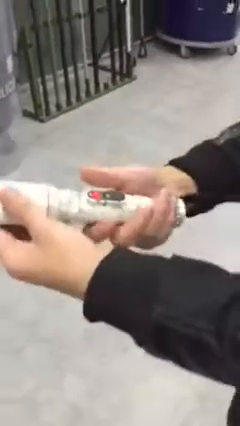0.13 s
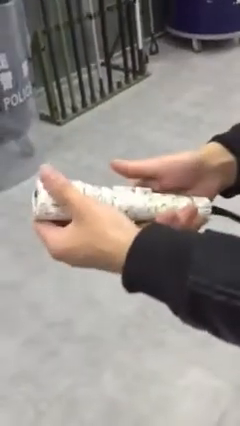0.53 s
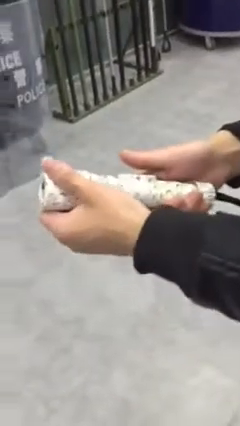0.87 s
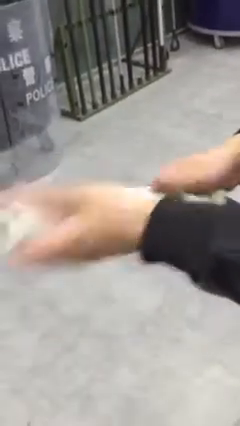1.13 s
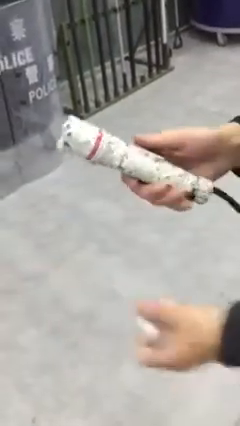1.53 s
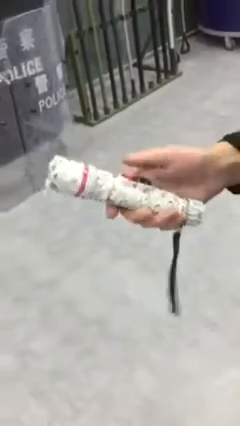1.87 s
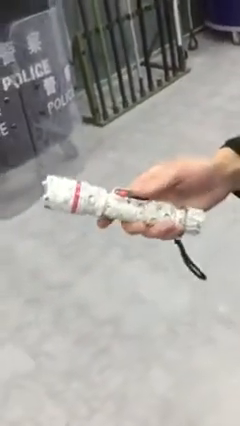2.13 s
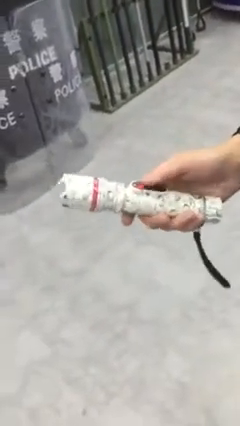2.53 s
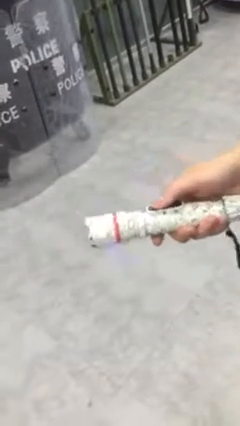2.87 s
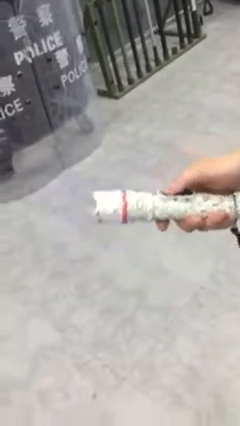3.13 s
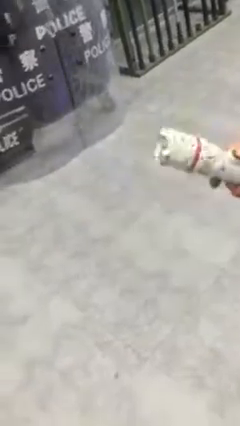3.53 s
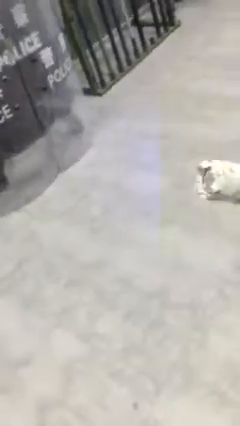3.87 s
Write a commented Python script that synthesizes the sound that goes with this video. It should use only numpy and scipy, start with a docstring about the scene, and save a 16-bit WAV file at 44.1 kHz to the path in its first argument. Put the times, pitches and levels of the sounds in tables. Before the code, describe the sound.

A stun gun is handled in a quiet, hard-floored room, with faint sleeve rustle and small clicks. At about 1.1 seconds its cap slides off with a quick falling hollow note and pop; at 1.75 it knocks down, rumbling low until 2.3. Soft bumps and a switch click with a tiny whine follow. From 2.7 to the end, deafening electric snaps crack rapidly, echoing brightly and thumping the overloaded, nearly mono microphone.

```python
"""Stun gun in a hard-floored room

A quiet room, a torch-shaped stun gun and a nearly mono microphone. Sleeves rustle; the cap is pulled off with
a falling cavity note and a pop, then put down with a knock and a hollow rumble, all made of filtered noise
and decaying tones. The switch clicks and sparks snap about thirteen times a second: nearly all are a noise
crack, slaps off floor and walls and a bright room ring, and jolt the overloaded microphone into a thump."""
import sys
import numpy as np
from scipy import signal
from scipy.fft import rfft, irfft
from scipy.io import wavfile

SR = 44100
rng = np.random.default_rng(int(sys.argv[2]) if len(sys.argv) > 2 else 0)


def to_wav(s):
    """Save 16-bit WAV."""
    ch = np.atleast_2d(s).T  # columns
    pcm = np.round(np.clip(ch, -1, 1) * 32767)  # PCM
    wavfile.write(sys.argv[1], SR, pcm.astype(np.int16))


N = 176400
T = np.arange(N) / SR   # time axis in seconds
HZ = np.maximum(np.fft.rfftfreq(N, 1 / SR), 1)   # frequency axis, kept above zero for logarithms

# Room air, spectrum under everything: pitch_hz, relative_db
AIR = [(20, -22), (66, -1), (150, -5.5), (335, -11), (462, -15.5), (709, -15.5), (2130, -23.5),
       (15000, -42.5)]
AIR_DB = -51

# Sleeve rustles: start_s (their peak), level_db, rise_s, fall_s
RUSTLES = [(.095, -41, 0.019, 0.073), (1.6, -54.5, 0.39, 0.97), (2.409, -48.5, 0.034, 0.085)]
# Spectrum of the cloth: pitch_hz, relative_db
RUSTLE_COLOUR = [(590, -27), (1000, -1), (1910, 4), (2290, 3.5), (8710, -11), (15000, -22)]
UNEVEN_DB, UNEVEN_HZ = 0.5, 25   # slow unevenness of rustle and rumble
# Light clicks of plastic and switch: start_s, level_db, centre_hz, width_octaves, fall_s
CLICKS = [(0.1907, -31.5, 5100, 0.45, 0.0026), (1.014, -38.5, 1460, 0.28, 0.026),
          (2.011, -42, 2280, 0.25, 0.017), (2.197, -42, 1420, 0.34, 0.027),
          (2.632, -37.5, 3090, 0.25, 0.0021)]
WHINE_S, WHINE_HZ, WHINE_DB, WHINE_FALL_S = 2.638, 8800, -45, 0.013   # the converter charging up
# Soft low bumps: start_s, level_db, pitch_hz
BUMPS = [(0.504, -35, 148), (0.578, -39, 154), (1.316, -36.5, 175), (2.04, -33, 102), (2.405, -32.5, 133),
         (2.425, -26, 137), (2.455, -26, 141), (2.48, -30.5, 158), (2.507, -33, 116), (2.546, -33.5, 143),
         (2.593, -33.5, 137), (2.685, -16.5, 185)]
BUMP_S = 0.0068   # onset to envelope peak

# The cap slides off and pops free; spectrum of friction and pop: pitch_hz, relative_db
POP_COLOUR = [(210, -66), (350, -57), (487, -11.5), (1330, -3.5), (2240, -9), (3060, -7.5), (3760, -8.5),
              (15000, -20)]
CAP_POP_S, POP_DB, POP_FALL_S = 1.1072, -22.5, 0.0016
SLIDE_DB, SLIDE_RISE_S, SLIDE_FALL_S = -26, 0.022, 0.0046
# Falling note of the cap's cavity: time_s, pitch_hz, level_db
CAVITY = [(1.04, 2688, -55), (1.068, 2500, -39.5), (1.082, 2060, -35), (1.095, 1686, -43),
          (1.103, 1279, -26), (1.115, 750, -39), (1.125, 650, -73)]
CAVITY_WIDTH_HZ = 210
GRIT_HZ, SLIDE_GRIT_DB = 500, 1.5   # how fast cracks and friction flicker, and how deeply the cap catches

# The cap is put down on something hollow; spectrum of the knock: pitch_hz, relative_db
KNOCK_COLOUR = [(88, -34), (150, -25), (540, 4), (812, -17), (1230, -6.5), (1410, -23), (1670, -8),
                (3130, -17), (14000, -43)]
KNOCK_S, KNOCK_DB, KNOCK_FALL_S = 1.751, -25.5, 0.024
# Spectrum of the rumble after it: pitch_hz, relative_db
RUMBLE_COLOUR = [(24, -41), (40, -5), (65, 5), (143, 2), (337, -9), (579, -13), (815, -20), (1360, -22),
                 (1920, -22), (5380, -25.5), (14000, -46)]
# Decay of the rumble: pitch_hz, t60_s
RUMBLE_T60 = [(80, 1.14), (300, 2.84), (2000, 1.55), (9000, 0.66)]
RUMBLE_DB, RUMBLE_BUILD_S, RUMBLE_STOP_S, RUMBLE_STOP_FALL_S = -26.5, 0.028, 2.26, 0.024
# Noisy resonances in the rumble: pitch_hz, level_db, width_hz
RUMBLE_BANDS = [(559, -39, 22), (1920, -44, 59), (2300, -44.5, 160)]
BANDS_FALL_S = 0.2
# Low tones of the hollow body: pitch_hz, level_db, t60_s
BODY_MODES = [(74.9, -26.5, 1.3), (139.6, -27.5, 1.25)]

HANDLING_ROOM_DB, HANDLING_T60_S = -14, 0.37   # room tail on handling and cap removal

# Sparks: start_s, crack_db, ring_db, kick_db, kick_fall_ms (the last two are the microphone's jolt)
SPARKS = [(2.7013, -8, -14, 5, 4.1), (2.745, -38, -15.5, -32, 1), (2.8487, -1.5, -14, 12, 1.7),
          (2.9184, 1.5, -15, -15, 0.36), (2.9871, -2.5, -18, 10.5, 0.73), (3.064, -5, -20, 2.5, 1.9),
          (3.138, -9, -19, -23, 1.1), (3.2262, -10.5, -20, 11, 0.39), (3.296, -0.5, -19.5, 1.5, 1.65),
          (3.377, -1, -17, 16, 0.27), (3.4574, -5, -19.5, 11, 0.71), (3.5383, -3, -17, 15, 0.32),
          (3.615, -2.5, -20.5, 5.5, 0.15), (3.6981, 5, -17.5, 6.5, 0.092), (3.7877, 4.5, -18, -1.5, 0.38),
          (3.8654, 0, -16.5, 11.5, 0.55), (3.9415, 1, -18, 17, 0.26)]
# A few milliseconds after some kicks, the slap off the floor kicks the microphone the other way: start_s,
# kick_db, kick_fall_ms
FLOOR_KICKS = [(2.7042, -8, 1.4), (2.8545, 6.5, 1.1), (2.9239, 10.5, 1.06), (2.9927, 9.5, 0.65),
               (3.07, 4, 0.52), (3.1441, -13, 2.3), (3.2312, -1, 1.5)]
JOLT_RISE_MS = 0.21
# The microphone's low cut, and the corners of the phase lag that turns a jolt into a falling sweep
MIC_CUT_HZ, MIC_Q = 58.2, 1.97
# All-pass corners of that lag: corner_hz
MIC_LAG_HZ = [76, 77, 575, 590, 600, 4770]

# Spectrum of the crack: pitch_hz, relative_db
CRACK_COLOUR = [(300, 9), (1000, 3.5), (2700, 2.5), (6000, 0.5), (10000, -9), (15000, -0.5)]
CRACK_RISE_S, CRACK_FALL_S, CRACK_GRIT_DB = 0.00082, 0.0013, 2.5
SWELL_DB, SWELL_RISE_S = -17, 0.012   # level and rise of a noise swell before the first crack
# Slaps off the floor and walls: delay_s, level_db against the ring; the first travels some 1.9 m further
ECHOES = [(.0054, 10.5), (0.0111, 8), (0.0162, 9), (0.0202, 2.5), (0.0224, 2.5), (.033, -5), (0.038, -8)]
ECHO_FALL_S, ECHO_WANDER = 0.00062, 0.025   # wander: random spread as a share of the delay

# The room's answer to a spark, spectrum: pitch_hz, relative_db
RING_COLOUR = [(88, -20), (150, -3.5), (283, -8), (409, -5.5), (833, -9.5), (1180, -6), (1320, -6.5),
               (2100, -2.5), (2270, -3), (6430, 1), (10800, -7.5), (15000, -10)]
# Decay of that ring: pitch_hz, t60_s
RING_T60 = [(200, 0.99), (1000, 0.55), (4000, 0.52), (8000, 0.42), (14000, 0.34)]
RING_DELAY_S, RING_BUILD_S = 0.003, 0.00093
RING_SHARED = 0.67   # share of power that repeats from spark to spark
REFLECTIONS_PER_S, REFLECTIONS_DB, REFLECTIONS_FADE_S = 1000, 0.5, 0.027
RING_CLUMP_DB, RING_CLUMP_HZ = 1.5, 146   # reflections arrive in clusters
# Tones of the room: pitch_hz, level_db against the ring, t60_s
ROOM_MODES = [(268, -10.5, .12), (487, -21, 0.098), (592.3, -10.5, 0.15), (2340, -13, 0.11)]

# Stereo spread: pitch_hz, side_against_mid_db
SIDE = [(500, -65), (2500, -64), (5000, -55)]
OVERLOAD_KNEE, CUTOFF_HZ = 4.3, 15000


def from_db(db):
    """Decibels to gain."""
    return 10 ** (np.asarray(db) / 20)


def rms_one(x):
    """Scale to unit rms."""
    return x / np.sqrt(np.mean(x ** 2) + 1e-20)


def at_hz(points, hz):
    """Read a table on a log-frequency axis."""
    corners, values = np.transpose(points)
    return np.interp(np.log(hz), np.log(corners), values)


def filtered(x, db):
    """Filter a sound by a level at each frequency."""
    return irfft(rfft(x) * from_db(db), N)


def noise(db):
    """Unit-rms noise with the given relative level at each frequency."""
    return rms_one(filtered(rng.standard_normal(N), db))


def swell(s, rise, fall):
    """Exponential rise to a moment and exponential fall after it."""
    return np.exp(-np.minimum(np.maximum((s - T) / rise, (T - s) / fall), 40))


def fade(fall):
    """Exponential fall from time zero."""
    return np.exp(-T / fall)


def fade_t60(t60):
    """Exponential fall that loses 60 dB in t60 seconds."""
    return np.exp(-np.log(1000) * T / t60)


def flicker(db, hz):
    """A unit-rms gain that wavers at random by so many decibels, mostly slower than the given rate."""
    return rms_one(from_db(db * noise(-20 * np.log10(1 + (HZ / hz) ** 2))))


def add(out, s, x):
    """Mix a sound in at a time."""
    i = int(s * SR)
    out[i:i + len(x)] += x[:N - i]


def narrow(hz, width_hz):
    """Noise in a resonance whose centre may move: slow noise modulates a sine."""
    slow = noise(-20 * np.log10(1 + (HZ / width_hz) ** 2))
    phase = 2 * np.pi * np.cumsum(hz + 0 * T) / SR
    return np.sqrt(2) * slow * np.sin(phase)


def modes(table):
    """Struck modes, each a sine dying at its own rate."""
    return sum(from_db(db) * np.sin(2 * np.pi * hz * T) * fade_t60(t60) for hz, db, t60 in table)


def dying(source, t60s, size):
    """Let each frequency die at its own rate, by crossfading bands that each have one decay."""
    hz = np.maximum(np.fft.rfftfreq(size, 1 / SR), 1)
    spectrum = rfft(source[:size])
    corners = np.log([f for f, _ in t60s])
    out = np.zeros(size)
    for share, (_, t60) in zip(np.eye(len(t60s)), t60s):
        band = spectrum * np.interp(np.log(hz), corners, share)
        out += irfft(band, size) * fade_t60(t60)[:size]
    return out


def air():
    """The quiet room's steady, mostly low noise."""
    return from_db(AIR_DB) * noise(at_hz(AIR, HZ))


def handling():
    """Sleeves rustle, plastic clicks, and the converter whines after the switch."""
    strokes = sum(from_db(db) * swell(s, rise, fall) for s, db, rise, fall in RUSTLES)
    out = noise(at_hz(RUSTLE_COLOUR, HZ)) * strokes * flicker(UNEVEN_DB, UNEVEN_HZ)
    for s, db, hz, octaves, fall in CLICKS:
        band = -20 * np.log10(1 + (np.log2(HZ / hz) / octaves) ** 2)
        out += from_db(db) * noise(band) * swell(s, 0.00066, fall)
    whine = narrow(WHINE_HZ, width_hz=500) * swell(WHINE_S, 0.0016, WHINE_FALL_S)
    return out + from_db(WHINE_DB) * whine


def bumps():
    """Each bump is a few soft low cycles."""
    out, t = np.zeros(N), T[:SR // 5]
    envelope = t / BUMP_S * np.exp(1 - t / BUMP_S)
    for s, db, hz in BUMPS:
        add(out, s, from_db(db) * envelope * np.sin(2 * np.pi * hz * t))
    return out


def cap_off():
    """Gritty friction swells while the cavity note falls, and ends in a pop."""
    s, hz, db = np.transpose(CAVITY)
    sounding = (T > s[0]) & (T < s[-1])
    note = narrow(np.interp(T, s, hz), CAVITY_WIDTH_HZ) * from_db(np.interp(T, s, db)) * sounding
    friction = from_db(SLIDE_DB) * swell(CAP_POP_S, SLIDE_RISE_S, SLIDE_FALL_S)
    friction *= flicker(SLIDE_GRIT_DB, GRIT_HZ)
    pop = from_db(POP_DB) * swell(CAP_POP_S, 0.00064, POP_FALL_S)
    return note + (friction + pop) * noise(at_hz(POP_COLOUR, HZ))


def cap_down():
    """A knock, then an uneven hollow rumble with a few resonances, until the cap comes to rest."""
    knock = from_db(KNOCK_DB) * noise(at_hz(KNOCK_COLOUR, HZ)) * swell(KNOCK_S, 0.0044, KNOCK_FALL_S)
    rumble = from_db(RUMBLE_DB) * dying(noise(at_hz(RUMBLE_COLOUR, HZ)), RUMBLE_T60, size=N)
    bands = sum(from_db(db) * narrow(hz, width) for hz, db, width in RUMBLE_BANDS)
    rumble += bands * fade(BANDS_FALL_S)
    rumble *= flicker(UNEVEN_DB, UNEVEN_HZ)
    hollow = np.zeros(N)
    add(hollow, KNOCK_S, (modes(BODY_MODES) + rumble) * (1 - fade(RUMBLE_BUILD_S)))
    return knock + hollow * swell(RUMBLE_STOP_S, np.inf, RUMBLE_STOP_FALL_S)   # full level until the stop


def room(x):
    """Diffuse reverberation: the sound convolved with half a second of decaying noise."""
    colour = at_hz([(2000, 7.0), (12000, 4.5)], HZ)   # pitch_hz, relative_db
    tail = (noise(colour) * fade_t60(HANDLING_T60_S))[:SR // 2]
    tail /= np.sqrt(np.sum(tail ** 2))   # unit energy
    return from_db(HANDLING_ROOM_DB) * signal.fftconvolve(x, tail)[:N]


def jolts():
    """Sparks and their floor slaps kick the overloaded microphone; filters smear each step into a thump."""
    kicks, ms = np.zeros(N), np.arange(2000) * 1000 / SR
    for direction, table in ((-0.97, SPARKS), (1, FLOOR_KICKS)):
        for s, *_, db, fall_ms in table:
            step = np.exp(-ms / fall_ms) * (1 - np.exp(-ms / JOLT_RISE_MS))
            add(kicks, s, direction * from_db(db) * step)
    w = 2 * np.pi * MIC_CUT_HZ
    low_cut = signal.bilinear([1, 0, 0], [1, w / MIC_Q, w * w], SR)
    out = signal.lfilter(*low_cut, kicks + 1e-18)   # the tiny offset keeps the filter out of denormals
    for hz in MIC_LAG_HZ:
        lag = signal.bilinear([-1, 2 * np.pi * hz], [1, 2 * np.pi * hz], SR)   # all-pass: delays, keeps level
        out = signal.lfilter(*lag, out + 1e-18)
    return out


def room_ring(shared):
    """Clusters of wall reflections merge into a bright diffuse tail."""
    colour = at_hz(RING_COLOUR, HZ)
    diffuse = np.sqrt(RING_SHARED) * shared + np.sqrt(1 - RING_SHARED) * noise(colour)
    taps = rng.standard_normal(N) * (rng.random(N) < REFLECTIONS_PER_S / SR)
    early = rms_one(filtered(taps, colour)) * from_db(REFLECTIONS_DB) * fade(REFLECTIONS_FADE_S)
    clumps = flicker(RING_CLUMP_DB, RING_CLUMP_HZ)
    return dying((diffuse + early) * clumps * (1 - fade(RING_BUILD_S)), RING_T60, size=24000)


def sparks():
    """Sparks crack and set the room ringing; all but the near-silent crack slap back off floor and walls."""
    cracks, slaps, rings = np.zeros((3, N))
    ring_colour = at_hz(RING_COLOUR, HZ)
    shared, tones = noise(ring_colour), modes(ROOM_MODES)
    slap = fade(ECHO_FALL_S)[:SR // 100]
    for s, crack_db, ring_db, _, _ in SPARKS:
        cracks += from_db(crack_db) * swell(s, CRACK_RISE_S, CRACK_FALL_S)
        if crack_db > ring_db:   # a ring swell with almost no crack gets no slaps
            for delay, db in ECHOES:
                wander = 1 + ECHO_WANDER * rng.standard_normal()
                add(slaps, s + delay * wander, from_db(ring_db + db) * slap)
        ring = room_ring(shared)
        add(rings, s + RING_DELAY_S, from_db(ring_db) * (ring + tones[:len(ring)]))
    cracks += from_db(SWELL_DB) * swell(SPARKS[0][0], SWELL_RISE_S, CRACK_FALL_S)
    snaps = cracks * noise(at_hz(CRACK_COLOUR, HZ)) * flicker(CRACK_GRIT_DB, GRIT_HZ)
    return snaps + slaps * noise(ring_colour) + rings


def scene():
    """Everything sits in the centre; a very faint side signal, 1.1 ms late, is strongest in the treble."""
    small = handling() + cap_off()
    mid = air() + small + room(small) + bumps() + cap_down() + jolts() + sparks()
    late = np.exp(-2j * np.pi * HZ * 0.0011)
    side = irfft(rfft(mid) * from_db(at_hz(SIDE, HZ)) * late, N)
    return np.array([mid + side, mid - side])


def record(dry):
    """The input overloads, the top is cut, and the peaks stop at full scale."""
    loud = dry / (1 + np.abs(dry) ** OVERLOAD_KNEE) ** (1 / OVERLOAD_KNEE)
    top_cut = signal.ellip(10, 0.2, 70, CUTOFF_HZ, fs=SR, output="sos")   # order, ripple dB, stopband dB
    return np.clip(signal.sosfilt(top_cut, loud), -1, 1)


dry = scene()
out = record(dry)
to_wav(out)
```